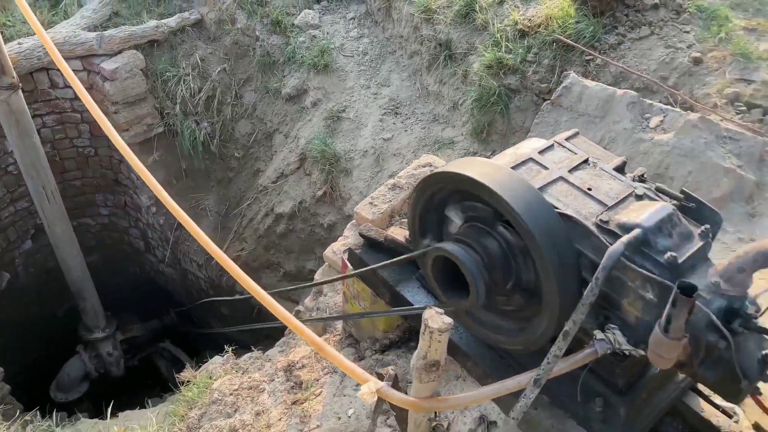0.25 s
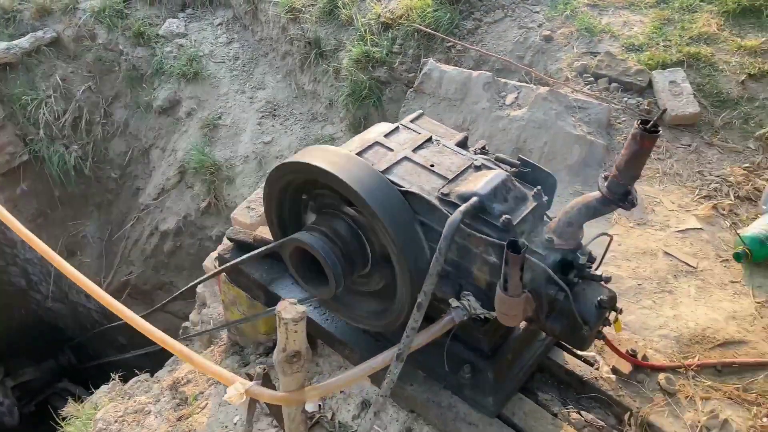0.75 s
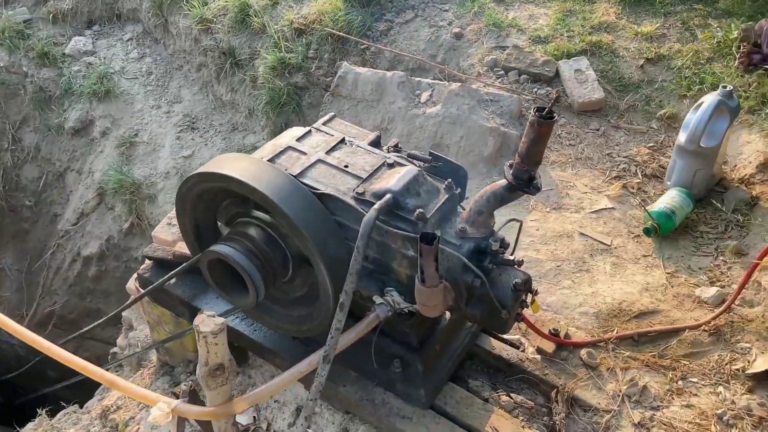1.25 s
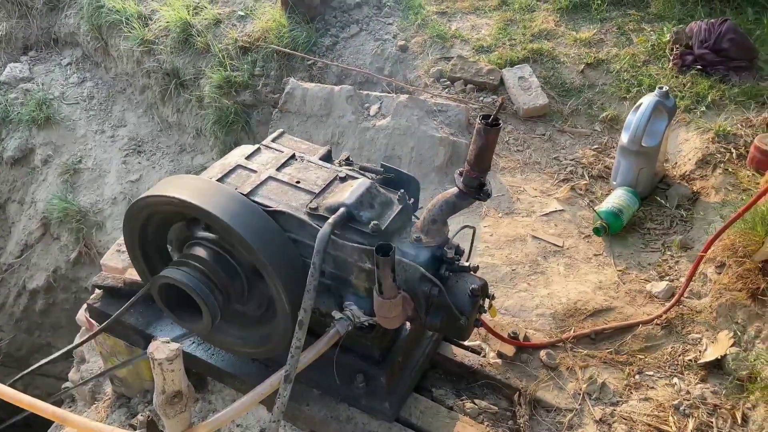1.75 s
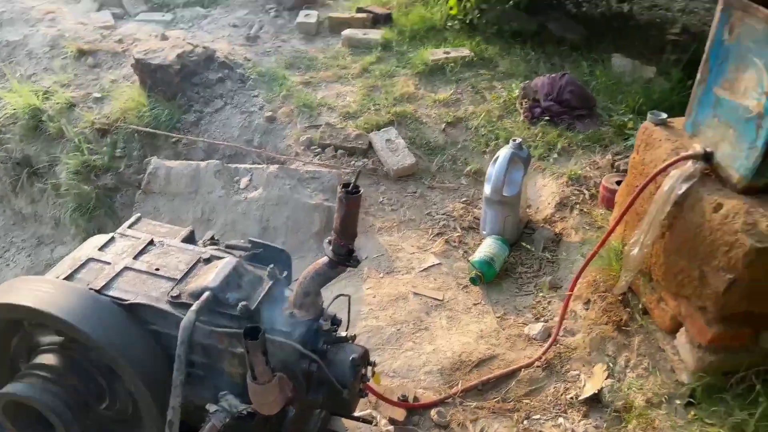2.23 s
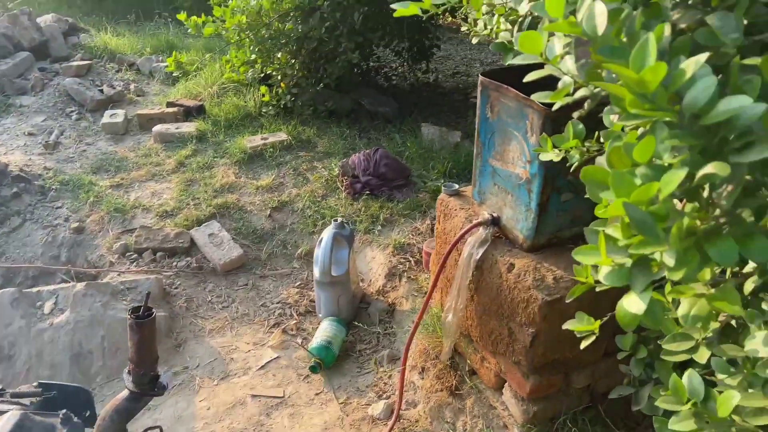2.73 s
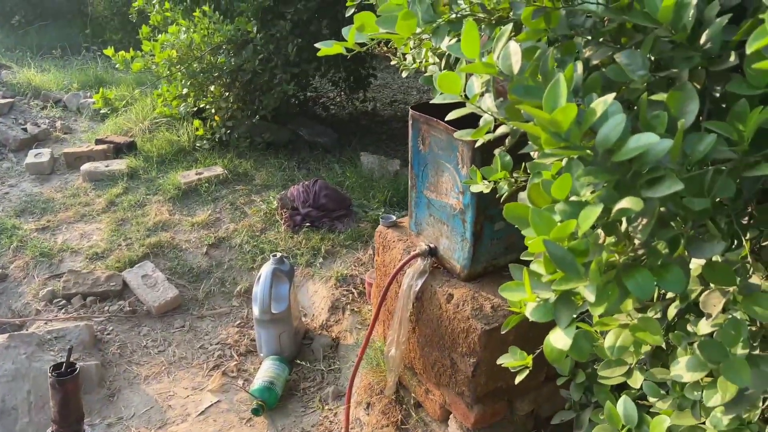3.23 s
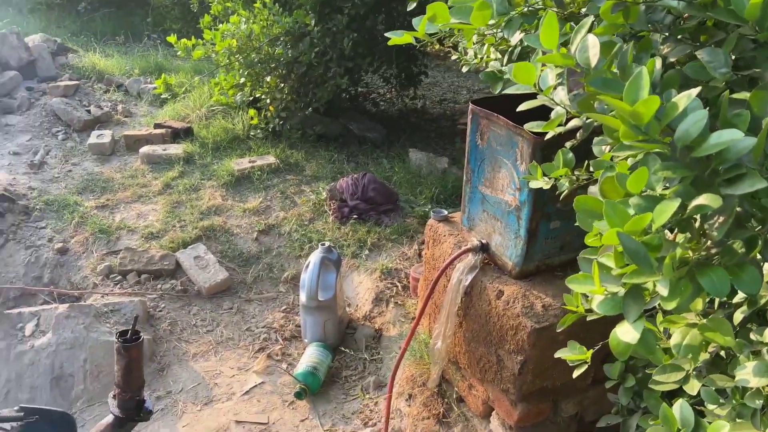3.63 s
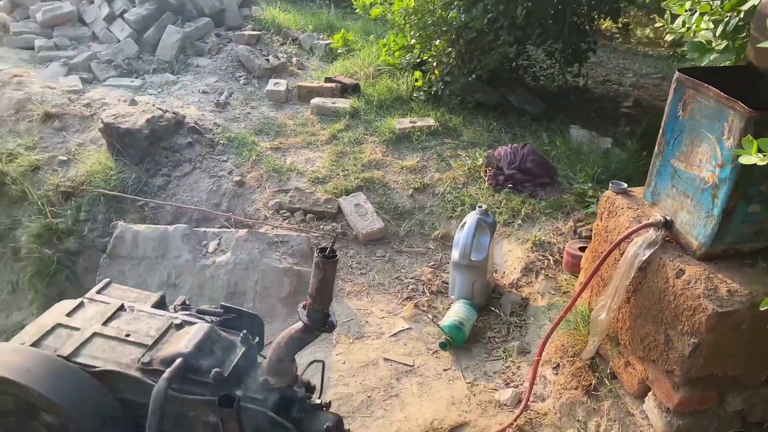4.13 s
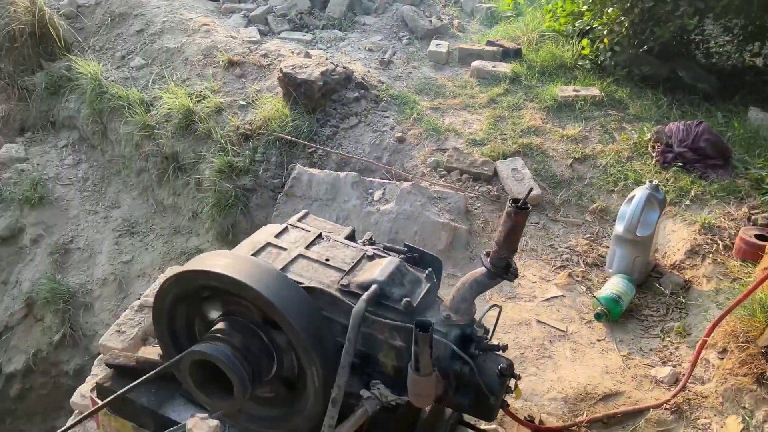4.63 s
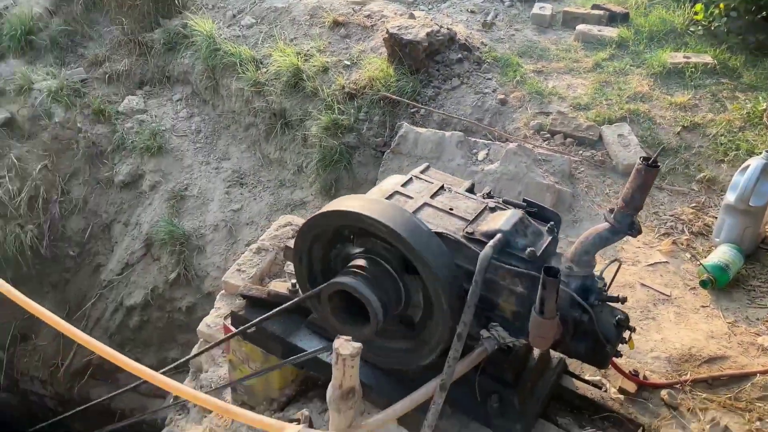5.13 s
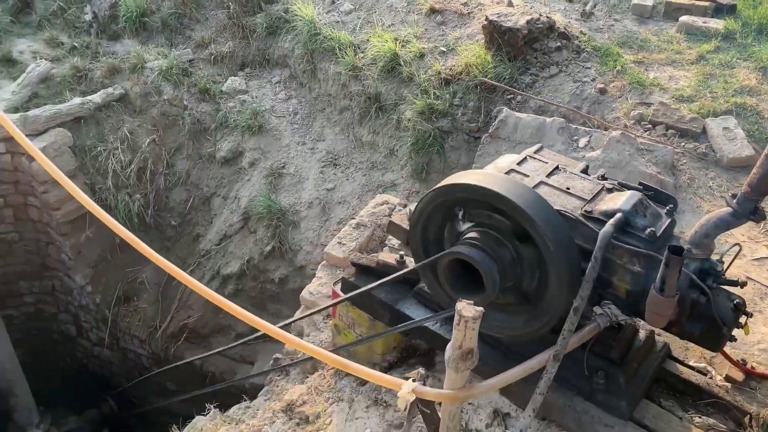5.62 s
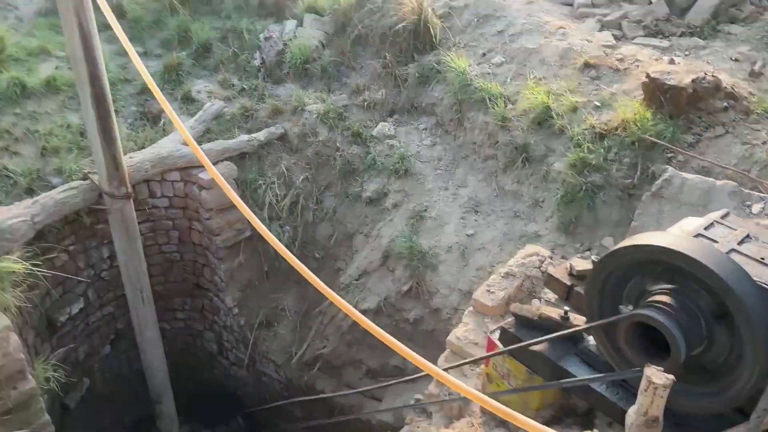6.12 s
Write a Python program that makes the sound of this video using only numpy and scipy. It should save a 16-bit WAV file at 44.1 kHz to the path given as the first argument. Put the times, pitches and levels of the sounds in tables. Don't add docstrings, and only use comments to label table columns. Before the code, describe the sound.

From 0 to about 6.4 seconds an old single-cylinder diesel engine runs without pause outdoors, at a nearly constant ten beats a second. Each beat begins with a hard mid-pitched combustion knock ringing the block; about 20 milliseconds later the exhaust valve cracks open with a short rough blast, followed by a low boom near 95 hertz, a lower rebound, gassy hiss and a small valve clack. Brief unsteady whistles, singing panels and random light metal clatter fill the gaps. Faint high belt chirps come near 0.5, 0.8, 1.5, 1.7, 2.7, 3.7, 4.7 and 5.5 seconds. The phone is about two metres away, the left side brighter and the right duller. As it swings, the sound is fullest from 0.6 to 2.2 seconds, slightly lower in the middle, then recedes by several decibels after 5.5 seconds, still running at the cut. Loud peaks are slightly rounded and deep bass is thin.

```python
import sys
import numpy as np
from scipy import signal
from scipy.fft import rfft, irfft
from scipy.io import wavfile
from scipy.ndimage import uniform_filter1d, map_coordinates

SR = 44100
rng = np.random.default_rng(int(sys.argv[2]) if len(sys.argv) > 2 else 0)


def log_audio(samples):
    frames = np.atleast_2d(samples).T
    limited = np.clip(frames, -1, 1)
    pcm = np.round(limited * 32767).astype(np.int16)
    wavfile.write(sys.argv[1], SR, pcm)


def gain_from_decibels(decibels):
    exponent = np.asarray(decibels, float) / 20
    return 10 ** exponent


N = 280917
TIME_S = np.arange(N) / SR
HZ = np.fft.rfftfreq(N, 1 / SR)

# t/s, nearness level/dB, aim [-1 engine to the right, 1 engine to the left]
HAND = [(0, 0, -0.71), (0.602, 1.9, 0.4), (1.0, 2.1, -0.31), (1.6, 1.2, 0.063), (2.1, 1.75, 1),
        (2.6, 0.55, 1), (3.2, 0.5, 1), (4.0, -0.5, 1), (4.651, 1, 0.91), (5.1, -0.5, 0.88),
        (5.501, -1.2, 0.37), (6.1, -3.8, -0.85), (6.37, -5, -0.78)]


def noise(colour, ripple_db=0.):
    hz, db = np.transpose(colour)
    tilt_db = np.interp(np.log(HZ + 1), np.log(hz), db)
    x = irfft(rfft(rng.standard_normal(N)) * gain_from_decibels(tilt_db + ripple_db), N)
    return x / x.std()


def walk(rate):
    hold = int(SR / rate)
    steps = np.repeat(rng.standard_normal(N // hold + 1), hold)
    return 0.75 * uniform_filter1d(uniform_filter1d(steps, hold), hold)[:N]


def swell(ms, tau):
    a = np.maximum(ms, 0) / tau
    return a * a * np.exp(2 - a) / 4


def add(out, s, sound):
    i = int(s * SR)
    a, b = max(i, 0), min(i + len(sound), N)
    if b > a:
        out[a:b] += sound[a - i:b - i]


def rings(blow, times, stroke_db, scatter_db, detune):
    out, ms = np.zeros(N), np.arange(SR // 10)[:, None] * 1000 / SR
    at_ms, modes = blow
    hz, tau, db = np.transpose(modes)
    chance = rng.standard_normal((len(times), 3, len(hz)))
    for s, gain_db, (pitch, level, length) in zip(times, stroke_db, chance):
        wave = np.sin(2 * np.pi * hz * (1 + detune * pitch) * ms / 1000)
        envelope = swell(ms, tau * (1 + 0.028 * length))
        add(out, s + at_ms / 1000, (wave * envelope) @ gain_from_decibels(db + gain_db + scatter_db * level))
    return out


def sway(spectrum, bands_hz, s, curves_db):
    out = irfft(spectrum, N)
    for (lo, hi), db in zip(bands_hz, curves_db):
        gain = gain_from_decibels(np.interp(TIME_S, s, db - np.mean(db)))
        out = out + (gain - 1) * irfft(spectrum * (HZ > lo) * (HZ <= hi), N)
    return out


def strokes():
    marks = np.array([.032, .4213, .8105, 1.1999, 1.5888, 1.9798, 2.3698, 2.7613, 3.1523, 3.5435, 3.9353,
                      4.327, 4.7182, 5.1094, 5.5008, 5.8933, 6.2858])
    # level/dB, dB per dB of nearness, dB per unit of aim, cycle scatter/dB
    boom_law = (0.091, 0.77, 0.01, 0.091)
    knock_law = (0.18, 0.63, 0.23, 0.59)
    blast_law = (-1.53, 0.98, 0.51, 0.83)
    jitter_ms = .18
    marks = np.r_[2 * marks[0] - marks[1], marks, 2 * marks[-1] - marks[-2]]
    chance = rng.standard_normal((4, 4 * len(marks) - 3))
    times = np.interp(np.arange(chance.shape[1]) / 4, np.arange(len(marks)), marks)
    times = times + jitter_ms / 1000 * chance[0]
    s, near_db, aim = np.transpose(HAND)
    near_db, aim = np.interp(times, s, near_db), np.interp(times, s, aim)
    levels = [db + a * near_db + b * aim + c * luck
              for (db, a, b, c), luck in zip((boom_law, knock_law, blast_law), chance[1:])]
    return times, *levels


def clatter(count=1800):
    out, ms = np.zeros(N), np.arange(SR // 60) * 1000 / SR
    for when, pitch, faint, length in rng.random((count, 4)):
        hz = 1300 * 7.0 ** pitch
        db = -43 - 3.4 * np.log(faint + .03) - 4.0 * pitch
        tick = swell(ms, 0.43 + 2.2 * length) * np.sin(2 * np.pi * hz * ms / 1000)
        add(out, when * N / SR, gain_from_decibels(db) * tick)
    return out


def belt():
    # t/s, peak level/dB, f/Hz, length/ms
    squeaks = [(.543, -26, 3750, 14), (.765, -30.5, 3650, 10), (.774, -31, 3450, 8), (.782, -29, 3350, 8),
               (1.512, -26, 3730, 16), (1.748, -30, 3450, 18), (2.711, -31, 3550, 6),
               (2.720, -29, 3370, 14), (3.680, -28, 3460, 8), (3.693, -29, 3400, 16),
               (4.655, -30.5, 3500, 8), (4.665, -34, 3320, 26), (5.444, -35.5, 3850, 26),
               (5.642, -30, 3350, 10), (5.652, -35, 3600, 10)]
    rise_per_ms, octave_db = .002, -10
    out = np.zeros(N)
    for s, db, hz, length_ms in squeaks:
        ms = np.arange(int(length_ms * SR / 1000)) * 1000 / SR
        phase = 2 * np.pi * np.cumsum(hz * (1 + rise_per_ms * (ms - length_ms / 2))) / SR
        squeak = np.sin(phase) + gain_from_decibels(octave_db) * np.sin(2 * phase)
        add(out, s, gain_from_decibels(db) * np.sin(np.pi * ms / ms[-1]) ** 0.58 * squeak)
    return out * gain_from_decibels(4.5 * walk(400))


def panels(times, blast_db, count=12):
    # lowest f/Hz, highest f/Hz
    panel_hz = (1500, 7220)
    ring_ms, latest_ms, level_db = 4.4, 30, -34
    out, ms = np.zeros(N), np.arange(SR // 11)[:, None] * 1000 / SR
    for s, db, (pitch, late, faint) in zip(times, blast_db, rng.random((len(times), 3, count))):
        hz = panel_hz[0] * (panel_hz[1] / panel_hz[0]) ** pitch
        ring = swell(ms - latest_ms * late, ring_ms) * np.sin(2 * np.pi * hz * ms / 1000)
        add(out, s, ring @ gain_from_decibels(level_db + 0.51 * db - 4.9 * late - 4.4 * faint - 4.4 * pitch))
    return out * gain_from_decibels(3.6 * walk(250))


def jet_tones(times, blast_db):
    # lowest f/Hz, highest f/Hz
    jet_hz = (1400, 4999)
    jet_db = np.array([-13.5, -15, -16, -19])
    out, ms = np.zeros(N), np.arange(SR // 40)[:, None] * 1000 / SR
    for s, db, (late, bend, pitch) in zip(times, blast_db, rng.random((len(times), 3, len(jet_db)))):
        hz = jet_hz[0] * (jet_hz[1] / jet_hz[0]) ** pitch
        turns = hz * ms * (1 + 0.0071 * (bend - .5) * ms) / 1000
        add(out, s - .001, (swell(ms - 3.4 * late, 1.24) * np.sin(2 * np.pi * turns)) @ gain_from_decibels(db + jet_db))
    return out * gain_from_decibels(2.2 * walk(500))


def intake(times, boom_db):
    # f/Hz, swell/ms, level/dB
    blow = (51.8, [(185, 8.5, -30), (276, 3.6, -41), (99, 14.0, -38)])
    return rings(blow, times, boom_db - 0.37, 0.27, 0.0048)


def tappet(times, knock_db):
    # f/Hz, swell/ms, level/dB
    blow = (38.5, [(1076, 4.1, -35), (1692, 3.2, -39), (693, 3.3, -34.5), (338, 4.7, -42.5)])
    return rings(blow, times, knock_db, 2.5, 0.06)


def valve_seat(times, boom_db):
    # f/Hz, swell/ms, level/dB
    blow = (27.0, [(431, 2.2, -20), (242, 1.5, -26), (528, 1.5, -31)])
    return rings(blow, times, boom_db + 1.6, 0.68, 0.01)


def gas(times, blast_db):
    # f/Hz, level/dB per Hz
    blast = [(500, -4.5), (1100, -5), (1700, 2), (2500, -2.5), (4200, 2), (5500, -2.5), (7000, -5.5),
             (9000, -11), (11500, -12), (13500, -17), (15300, -15)]
    hiss = [(300, -10), (540, 7.5), (850, 2), (1090, 5), (1280, -1), (1700, 3), (2300, -4.5), (3500, -2),
            (5800, -4), (7000, -8), (8200, -13.5), (9500, -15), (12000, -18), (15300, -18.5)]
    rumble = [(30, -28), (55, 14), (100, -38), (200, 4), (450, 0.5), (900, -1), (1500, -9), (3600, -23.5),
              (7000, -39), (12000, -42), (15000, -38)]
    spit_colour = [(6000, -14), (9500, -17.5), (12000, 3.5), (15500, 1.5)]
    # t/ms from valve opening, level/dB
    flow_curve = [(-22, -15.5), (-14.5, 0), (-1, -7.5), (-3.5, 6), (14.5, -2.5), (22, 2), (31, -4.5),
                  (43.5, -4), (71.5, -17)]
    # t/ms from valve opening, swell/ms, level/dB
    spits = [
        (-18, 3, -40.5),
        (-1.5, 0.92, -22.5),
    ]
    burst_level_db, hiss_level_db, rumble_level_db = -11, -25.5, -35
    k = np.clip(np.searchsorted(times, TIME_S + .03) - 1, 0, len(times) - 1)
    late = 0.31 * rng.standard_normal(len(times))[k]
    ms, cycle_db = (TIME_S - times[k]) * 1000, blast_db[k]
    burst = swell(ms + 1.75 - late, 2.29) * gain_from_decibels(burst_level_db + cycle_db)
    flow = gain_from_decibels(hiss_level_db + 0.7 * cycle_db + np.interp(ms, *np.transpose(flow_curve)))
    spit = sum(swell(ms - at_ms - late, tau) * gain_from_decibels(db + cycle_db) for at_ms, tau, db in spits)
    eddies, gusts = gain_from_decibels(1.42 * walk(600)), gain_from_decibels(2.23 * walk(150))
    casing_db = 3.5 * walk(40)[:len(HZ)]
    draws = []
    for _ in range(2):
        jet = eddies * (burst * noise(blast) + spit * noise(spit_colour))
        draws.append(jet + flow * gusts * noise(hiss, casing_db) + gain_from_decibels(rumble_level_db) * noise(rumble))
    return draws


def pipe_boom(times, boom_db):
    # f/Hz, swell/ms, level/dB
    boom = (9.2, [(95, 4.2, -13)])
    rebound = (22.2, [(74, 3.7, -18)])
    out = rings(boom, times, boom_db + 0.021, 0.12, 0.0022)
    return out + rings(rebound, times, boom_db + 0.75, .1, .003)


def exhaust_valve(times, knock_db):
    # f/Hz, swell/ms, level/dB
    lift = (-5.6, [(143, 6.9, -22), (749, 2.2, -23), (602, 1.7, -21)])
    crack = (-.7, [(373, .8, -15), (833, 1.0, -23)])
    out = rings(lift, times, knock_db + 0.15, 0.21, 0.0065)
    return out + rings(crack, times, knock_db + 0.43, 0.81, 0.039)


def combustion(times, knock_db):
    # f/Hz, swell/ms, level/dB
    hum = (-23.0, [(557, 11.0, -39), (833, .9, -32)])
    knock = (-19.4, [(560, 5.4, -20), (680, 3.3, -25), (752, 1.7, -13), (876, 3.6, -27), (511, 1.5, -23)])
    out = rings(hum, times, knock_db + 0.1, 1.5, 0.002)
    return out + rings(knock, times, knock_db + 0.084, 1.0, 0.0013)


def right_port(same, other):
    # f/Hz, level/dB, lead/rad, unrelated share [0-1]
    ports = [(40, .3, -.15, .01), (90, .3, -.27, .01), (170, -1.5, -.7, .02), (330, -6.5, -1.05, .04),
             (550, -12.5, -.6, .06), (760, -4.5, -1.1, .08), (1300, -8, -2.6, .2), (2600, -9, -3.2, .3),
             (3400, -14, -2.8, .4), (5400, -18, -2.0, .7), (7500, -10, 0, .6), (9200, -1, 2.2, .25),
             (10250, 0, 3.14, .2), (16500, 0, 14.1, .2)]
    # low f/Hz, high f/Hz, delay/ms per unit of aim
    detour = [(0, 1600, .23), (1600, 7000, .14), (7000, 30000, 0)]
    # level/dB per unit of aim, level/dB per aim squared
    shadow = [(2, -2), (1.6, -6.5), (0.7, -0.5)]
    shadow_hz = [(480, 900), (900, 2000), (2000, 9000)]
    hz, db, lead, share = np.transpose(ports)
    share = np.clip(np.interp(HZ, hz, share), 0, 1)
    turn = np.exp(1j * np.interp(HZ, hz, lead))
    mixed = np.sqrt(1 - share) * turn * rfft(same) + np.sqrt(share) * rfft(other)
    far = gain_from_decibels(np.interp(HZ, hz, db)) * mixed
    s, _, aim = np.transpose(HAND)
    swing = np.interp(TIME_S, s, aim - np.mean(aim))
    late = np.zeros(N)
    for lo, hi, ms in detour:
        band = irfft(far * (HZ >= lo) * (HZ < hi), N)
        late += map_coordinates(band, [np.arange(N) - ms * swing * SR / 1000], mode="mirror")
    shadow_db = np.array([a * aim + b * aim ** 2 for a, b in shadow])
    return sway(rfft(late), shadow_hz, s, -shadow_db)


def pair(body, near, far):
    # low f/Hz, high f/Hz
    ground_hz = [(130, 330), (500, 640), (680, 950), (950, 1400), (1800, 3800), (5000, 8000), (8000, 17000)]
    ground_db = [-0.69, -1.2, 2.76, 1.4, 1.2, 0.48, -1]
    s, _, aim = np.transpose(HAND)
    both = rfft([body + near + clatter(), body + far + clatter()])
    left, other = sway(both, ground_hz, s, np.outer(ground_db, aim))
    return np.array([left, right_port(left, other)])


def scene():
    times, boom_db, knock_db, blast_db = strokes()
    body = belt() + panels(times, blast_db) + jet_tones(times, blast_db)
    body += intake(times, boom_db) + tappet(times, knock_db) + valve_seat(times, boom_db)
    body += pipe_boom(times, boom_db) + exhaust_valve(times, knock_db) + combustion(times, knock_db)
    near, far = gas(times, blast_db)
    return pair(body, near, far)


def starve(x, margin_db=9, luck_db=6):
    # low f/Hz, high f/Hz, channel [0 mid, 1 side]
    starved = [(9400, 11000, 0), (13000, 14500, 0), (11200, 12900, 1), (14900, 15800, 1), (15600, 22000, 0),
               (15800, 22000, 1)]
    hz, _, frames = signal.stft(np.array([x[0] + x[1], x[0] - x[1]]) / 2, SR, nperseg=512)
    treble = np.sum(np.abs(frames[:, hz > 9000]) ** 2, axis=(0, 1))
    count = len(treble)
    for lo, hi, k in starved:
        luck = np.repeat(rng.standard_normal(count), 4)[:count]
        edge = 200 * np.repeat(rng.standard_normal((2, count)), 4, axis=1)[:, :count]
        bar = np.median(treble) * gain_from_decibels(2 * (margin_db + luck_db * luck))
        strip = (hz[:, None] >= lo + edge[0]) & (hz[:, None] < hi + edge[1])
        frames[k][strip & (treble < bar)] = 0
    mid, side = signal.istft(frames, SR, nperseg=512)[1][:, :N]
    return np.array([mid + side, mid - side])


def band_limit(x):
    return signal.sosfilt(signal.butter(12, 16790, fs=SR, output="sos"), x)


def record(dry):
    bass_cut = signal.butter(2, 36, "highpass", fs=SR, output="sos")
    top_cut = signal.cheby2(9, 42, 16450, fs=SR, output="sos")
    x = np.tanh(.85 * signal.sosfiltfilt(bass_cut, dry)) / .85
    x = np.clip(signal.sosfilt(top_cut, x), -.95, .95)
    return band_limit(starve(x))


dry = scene()
out = record(dry)
log_audio(out)
```